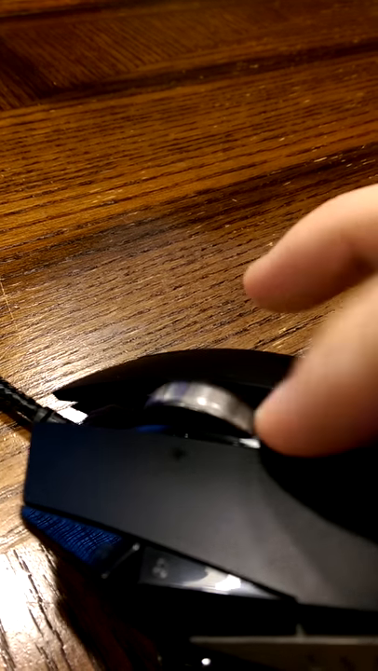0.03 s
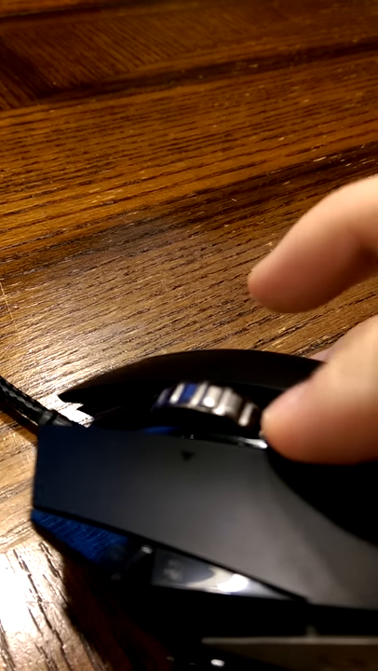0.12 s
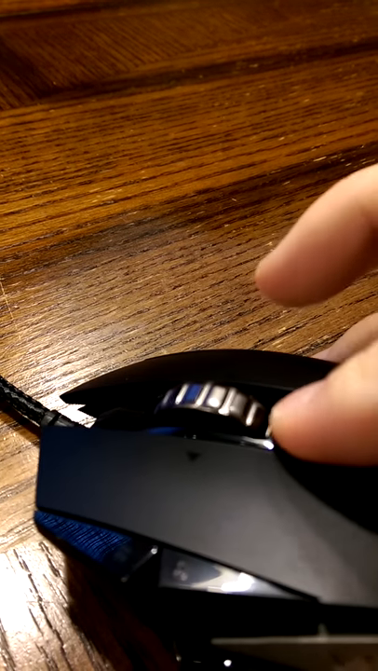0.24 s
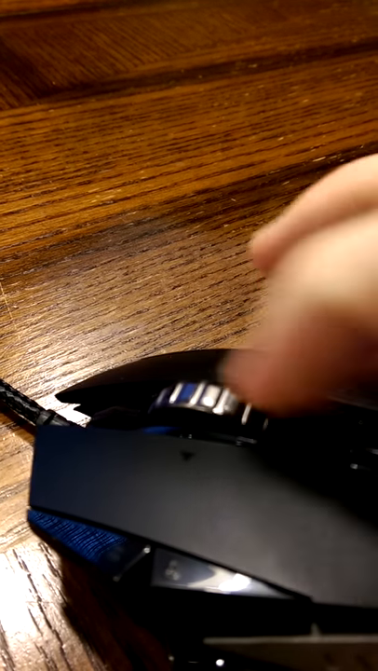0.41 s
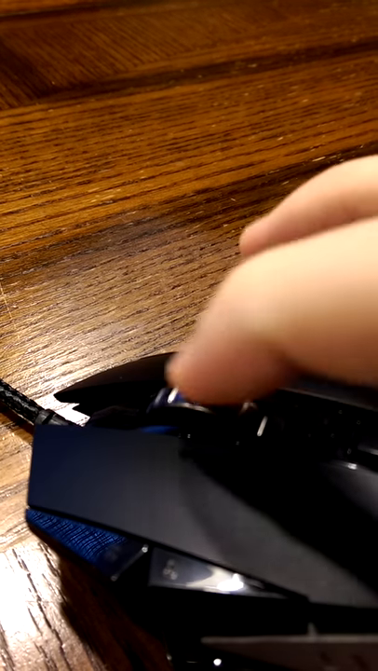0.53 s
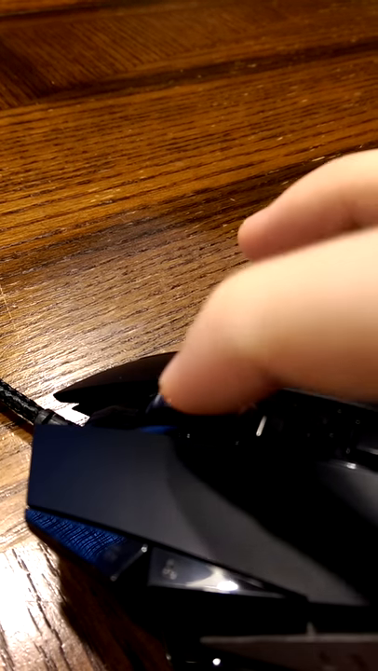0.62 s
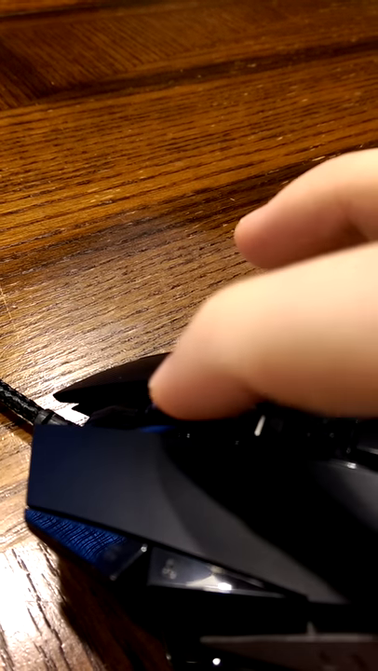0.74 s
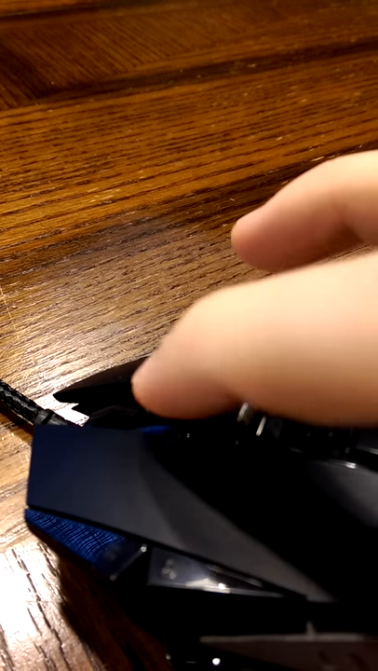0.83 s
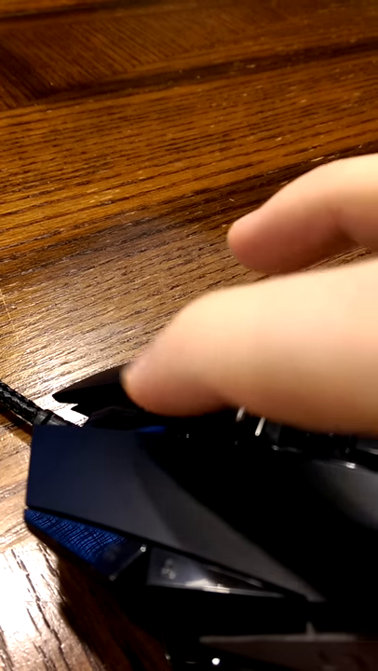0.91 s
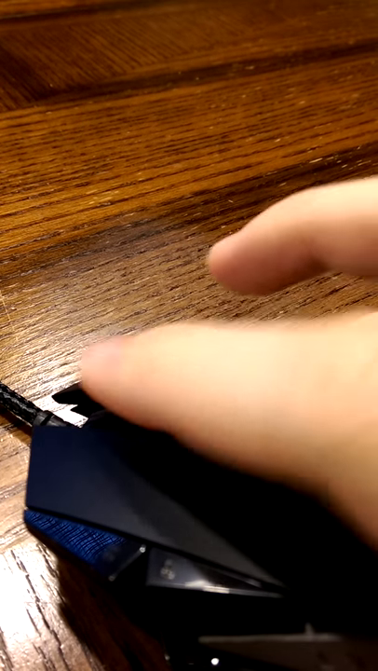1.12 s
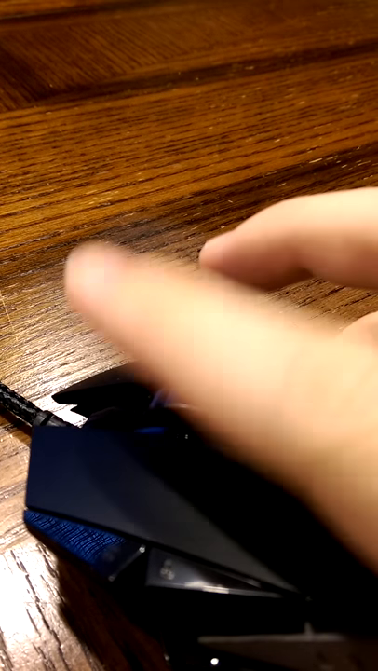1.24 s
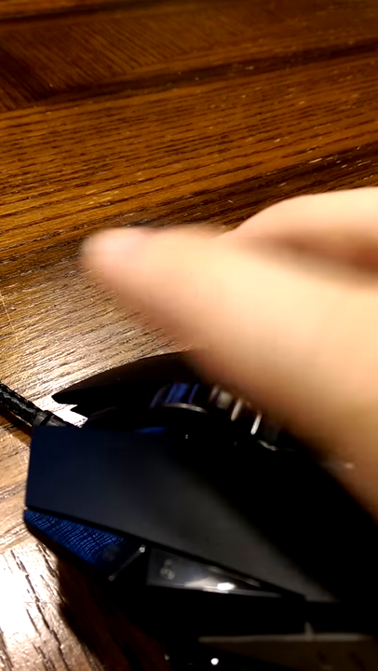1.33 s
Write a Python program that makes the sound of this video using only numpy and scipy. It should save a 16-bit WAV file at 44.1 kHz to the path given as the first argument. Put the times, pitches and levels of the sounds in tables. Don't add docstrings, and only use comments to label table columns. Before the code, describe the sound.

Close-up mouse wheel: light ticking and finger rub lead into two hard plastic clicks about a fifth of a second apart, then quiet, then weak notchy ticks with soft low table thumps, in a small room.

```python
import sys
import numpy as np
from scipy import signal
from scipy.fft import rfft, irfft, next_fast_len
from scipy.io import wavfile
from scipy.ndimage import uniform_filter1d

SR = 44100
rng = np.random.default_rng(int(sys.argv[2]) if len(sys.argv) > 2 else 0)


def store_pcm(level_fs):
    pcm = np.round(np.clip(level_fs, -1, 1) * 32767).astype(np.int16)
    wavfile.write(sys.argv[1], SR, np.atleast_2d(pcm).T)


def field_ratio(decibels):
    return 10 ** (np.asarray(decibels, dtype=float) / 20)


N = 59535

# [t/s, peak level/dB, rattle/ms, tilt/dB per octave]
LATCH_CLICKS = [
    (0.2172, -5.5, 0.8, 0.5),
    (0.4199, -5, 1.8, 2.5),
]
# [t/s, peak level/dB, rattle/ms, tilt/dB per octave]
DETENT_TICKS = [(0.1425, -34, 0.83, 7), (0.1466, -38.5, 2.5, -19), (0.1548, -33, 1.1, 0.5),
                (0.1847, -42.5, 2.6, 3), (0.187, -40, 1.3, 15), (0.1945, -42, 1.7, -10),
                (0.197, -46, 0.88, -3), (0.2045, -41, 0.85, -4), (0.2075, -47, 1.7, -4),
                (0.8956, -32.5, 1, -6.5), (0.9006, -37.5, 1.35, -25), (0.9097, -41.5, 0.74, -14),
                (0.9215, -51, 1.2, -6), (1.1502, -53, 1.7, -8), (1.0853, -32, 3.26, -4),
                (1.081, -52.5, 1.2, -3), (1.1566, -33, 2.4, -6), (1.165, -54, 1.5, -20),
                (1.1999, -32, 2.8, -4.5), (1.2034, -37, 1.8, -21.5), (1.2217, -43.5, 3.6, -32),
                (1.2448, -41, 0.72, 1)]
# [t/s, peak level/dB, rattle/ms, tilt/dB per octave]
SHELL_KNOCKS = [(0.029, -45, 1, -2), (0.115, -47.5, 2.27, -3), (0.147, -28.5, 0.56, -6.5),
                (0.158, -33.5, 0.53, 3), (0.189, -30.5, 2.8, 4), (0.193, -33, 0.32, -4),
                (0.197, -31, 1, 16), (0.208, -36, 1.7, 5), (0.217, -14, 3.8, 4.5), (0.379, -45, 0.58, -3),
                (0.421, -12.5, 1.8, 2), (0.8897, -36.5, 0.86, -1.5), (0.9017, -26, 1.13, 0.5),
                (0.91, -38, 1.2, 27), (0.92, -33, 1.7, 1.5), (0.996, -51, 1.14, 16), (1.081, -42, 1.6, 8),
                (1.0895, -32.5, 1.7, -7.5), (1.096, -31.5, 1, 4), (1.151, -38, 5.5, 18),
                (1.159, -36, 0.86, -3), (1.167, -39, 2.8, -14), (1.1935, -32.5, 4.3, -1),
                (1.2035, -30, 0.73, -18), (1.2232, -30.5, 0.88, 4.5), (1.2295, -39.5, 2.3, 10),
                (1.247, -46, 1.36, -1), (1.255, -41.5, 1.6, 0.5)]
# [t/s, peak level/dB, push/ms, tilt/dB per octave]
TABLE_PUSHES = [(0.0, -49.5, 0.77, -5), (0.147, -41.5, 1.3, 0), (0.189, -38, 0.68, -5),
                (0.214, -32, 1, 3.5), (0.233, -29.5, 0.84, 13), (0.424, -43.5, 1.09, -2.5),
                (0.892, -38.5, 0.51, 0.5), (0.92, -34, 0.65, 17), (0.965, -73, 1.5, 11),
                (0.999, -43.5, 1.2, 13), (1.094, -29, 0.44, -3), (1.111, -30, 0.35, 9),
                (1.165, -33, 2.1, -2.5), (1.172, -33.5, 1.13, 24), (1.203, -33, 1.2, 15),
                (1.235, -35.5, 0.56, 1), (1.255, -42, 0.47, 4)]
# [t/s, length/s, level/dB]
RUBS = [
    (0.14, 0.044, -43),
    (0.181, 0.083, -38.5),
    (0.891, 0.028, -35.5),
    (1.082, 0.038, -42),
    (1.149, 0.16, -49),
]
# [t/s, length/s, level/dB]
SLIPS = [
    (0.121, 0.03, -63),
    (0.882, 0.023, -62.5),
    (1.069, .022, -58.5),
    (1.133, 0.02, -59.5),
    (1.185, 0.013, -54),
    (1.235, .014, -57),
]

# [f/Hz, level/dB, t60/s]
LATCH_IN_MODES = [(1805, -15, 0.01), (2390, -14.5, 0.022), (2940, -9, 0.012), (3510, -6, 0.0098),
                  (5030, -3, 0.015), (6330, -6, 0.008), (7640, -0.5, 0.007), (4280, -7.5, 0.0045),
                  (9440, -10.5, 0.005), (10770, -0.5, 0.006), (11690, -2, 0.0046), (11900, -3, 0.0059),
                  (13560, -5.5, 0.0036)]
LATCH_BACK_MODES = [(1500, -9, 0.008), (2301, -9.5, 0.0071), (3057, -9, 0.0088), (3700, -11.5, 0.0057),
                    (4908, -6.5, 0.012), (6120, -1.5, 0.0066), (7444, 0, 0.0047), (8830, -9, 0.0081),
                    (9600, -2.5, 0.006), (11060, 2, 0.0038), (11356, 2, 0.0052), (12560, -3, 0.0043),
                    (14300, -12.5, 0.0042)]
DETENT_MODES = [(3820, -12.5, 0.0073), (4810, -10, 0.0098), (5557, -3, 0.0088), (6130, -4.5, 0.0052),
                (7300, 2.5, 0.0041), (8940, -11.5, 0.0064), (10170, -10, 0.0064), (12300, -17.5, 0.0054),
                (13700, -16.5, 0.00713)]
SHELL_MODES = [(928, -7, 0.033), (1034, 1.5, 0.013), (1173, 8, 0.011), (1566, 2, 0.005), (1706, -8, 0.044),
               (2078, 3.5, 0.014), (2350, 0, 0.013), (2806, 0, 0.0071)]
TABLE_MODES = [(168, -0.5, 0.34), (208.5, -4, 0.23), (75, -12.5, 0.047), (265.9, 6.5, 0.28),
               (282.5, 2.5, 0.74), (335.6, 9.5, 0.22), (408.2, -4, 0.3), (528.4, -2, .04)]

# [f/Hz, level/dB per Hz]
RUB_SPECTRUM = [(350, -30), (600, -6), (1190, -11.5), (1580, -13.5), (4230, -21.5), (5250, -19.5),
                (15000, -44)]
# [f/Hz, level/dB per Hz]
SLIP_SPECTRUM = [(3500, -41), (5500, 4), (8000, 5), (10000, -20)]
# [f/Hz, level/dB]
FAR_SHADOW = [(300, -5), (1100, -4), (1800, -4.5), (3000, -33), (5500, -46.5), (8000, -55.5), (15000, -49)]
# [f/Hz, level/dB, t60/s]
ROOM_BANDS = [(685, -25, 0.3), (1010, -31.5, 0.45), (1526, -32, 0.47), (1900, -37, 0.61), (3000, -32, 0.47),
              (3900, -30.5, 0.27), (4900, -39.5, 0.5), (5400, -42.5, 0.65), (6200, -31.5, 0.41),
              (6690, -38, 0.51), (7490, -34, 0.44), (8560, -33, .4), (10580, -34.5, 0.5),
              (12100, -37, 0.41), (14800, -46.5, .18)]
# [f/Hz, level/dB]
ROOM_FAR_PORT = [(300, -3), (1300, -0.9), (3000, -6), (6000, -19.5), (12000, -57)]
# [f/Hz, level/dB per Hz]
FLOOR_SPECTRUM = [(25, -14.5), (70, -11.5), (300, -7), (500, -8.5), (1000, -24), (5000, -29.5),
                  (14500, -34.5), (16000, -39)]
# [f/Hz, level/dB]
FLOOR_BALANCE = [(60, 9.5), (300, 3.5), (2400, 2), (8000, 4), (15000, 2.5)]

CLICK_DB, TICK_DB, KNOCK_DB, PUSH_DB = 5, 4.5, 0.5, -6
LATCH_VARY_DB, PLASTIC_VARY_DB, TABLE_VARY_DB = 1.2, 2.5, 1.2
LATCH_DETUNE, PLASTIC_DETUNE, TABLE_DETUNE = 0.002, 0.018, 0.004
HARD, SOFT = 0.9, 0.15
KNOCK_LEAD = 50
SMALL_BODY_HZ = 800
WAVER_DB, FAR_LAG_MS = 1.0, 0.22
ROOM_START_MS, WALL_MS, WALL_SPREAD_MS, WALL_DB = 2.9, 12.3, 3.0, -34
FLOOR_DB, FLOOR_WIDE_HZ = -63.5, 1470


def shape(points, hz):
    p = np.array(points, float)
    return np.interp(np.log(hz + 1), np.log(p[:, 0]), p[:, 1])


def colour(x, points, lag_ms=0.0):
    n = next_fast_len(x.shape[-1] + 4096)
    hz = np.arange(n // 2 + 1) * SR / n
    lag = np.exp(-2j * np.pi * hz * lag_ms / 1000)
    return irfft(rfft(x, n) * field_ratio(shape(points, hz)) * lag, n)[..., :x.shape[-1]]


def unit(x):
    return x / np.sqrt(np.mean(x ** 2))


def high_pass(x, order, hz):
    return signal.sosfilt(signal.butter(order, hz, "high", fs=SR, output="sos"), x)


def contact(ms, rough, chance):
    u = np.arange(512) / SR * 1000 / max(ms, 0.1)
    push = np.sqrt(u) * np.exp(-2 * u) * (rough * chance + 1 - rough)
    tones = rfft(push)
    whiten = (np.abs(tones) + 1e-9) ** (rough > 0.5)
    return irfft(tones / whiten) * np.exp(-(u / 3) ** 4)


def strike(events, modes, db, scatter_db, rough, detune, size):
    out = np.zeros((2, N + 2 * size))
    t = np.arange(size) / SR
    hz, gain_db, t60 = np.array(modes, float).T[:, :, None]
    count = len(modes)
    sign = (-1.0) ** np.arange(count)[:, None]
    fade = np.exp(-np.log(1000) * t / t60)
    chance = rng.standard_normal((len(events), 2 * count + 512))
    for (start, peak_db, ms, tilt_db), c in zip(events, chance):
        level_chance, pitch_chance = c[:count, None], c[count:2 * count, None]
        gain = field_ratio(gain_db + scatter_db * level_chance + tilt_db * np.log2(hz / hz[0]))
        wave = gain * sign * np.sin(2 * np.pi * hz * (1 + detune * pitch_chance) * t)
        ring = np.sum(wave * fade, axis=0)
        hit = signal.fftconvolve(ring, contact(ms, rough, c[-512:]))[:size]
        hit *= field_ratio(peak_db + db) / np.abs(hit).max()
        blur = np.sum(wave * fade ** 4, axis=0)
        blur *= np.sqrt(np.sum(hit ** 2) / np.sum(blur ** 2))
        i = max(int(start * SR), 0)
        out[:, i:i + size] += [hit, blur]
    return out[:, :N]


def latch_clicks():
    return sum(strike([click], modes, CLICK_DB, LATCH_VARY_DB, HARD, LATCH_DETUNE, size=1500)
               for click, modes in zip(LATCH_CLICKS, (LATCH_IN_MODES, LATCH_BACK_MODES)))


def detent_ticks():
    return strike(DETENT_TICKS, DETENT_MODES, TICK_DB, PLASTIC_VARY_DB, HARD, PLASTIC_DETUNE, size=1000)


def shell_knocks():
    knocks = strike(SHELL_KNOCKS, SHELL_MODES, KNOCK_DB, PLASTIC_VARY_DB, HARD, PLASTIC_DETUNE, size=2500)
    return np.roll(knocks, -KNOCK_LEAD, axis=1)


def rub():
    t = np.arange(N) / SR
    env = sum(field_ratio(db) * np.clip((t - start) / 0.0028, 0, 1) * np.clip(1 - (t - start) / length, 0, 1)
              for start, length, db in RUBS)
    grain_db = 4 * unit(uniform_filter1d(rng.standard_normal(N), size=90))
    grains = rng.standard_normal(N) * field_ratio(grain_db)
    return unit(colour(grains, RUB_SPECTRUM)) * env


def slip():
    t = np.arange(N) / SR
    env = 0
    for start, length, db in SLIPS:
        swell = np.clip((t - start) / length, 0, 1) ** 0.5
        release = np.exp(-np.clip(t - start - length, 0, 1) / 0.006)
        env = env + field_ratio(db) * swell * release
    return unit(colour(rng.standard_normal(N), SLIP_SPECTRUM)) * env


def table():
    drift = uniform_filter1d(rng.standard_normal(N), size=500)
    waver = unit(uniform_filter1d(drift, size=500))
    hum = strike(TABLE_PUSHES, TABLE_MODES, PUSH_DB, TABLE_VARY_DB, SOFT, TABLE_DETUNE, size=14000)[0]
    return high_pass(hum * field_ratio(WAVER_DB * waver), 2, 45)


def room(x):
    t = np.arange(SR) / SR
    tones = rfft(rng.standard_normal((2, SR)))
    octave = np.log2(np.arange(SR // 2 + 1) + 1)
    hz, level_db, t60 = np.array(ROOM_BANDS).T
    tail = 0
    for k, share in enumerate(np.eye(len(hz))):
        band = irfft(tones * np.interp(octave, np.log2(hz), share))
        tail = tail + field_ratio(level_db[k]) * band * np.exp(-np.log(1000) * t / t60[k])
    ms = t * 1000
    onset = np.clip(ms / ROOM_START_MS - 1, 0, 1)
    wall = field_ratio(WALL_DB + 38) * np.exp(-((ms - WALL_MS) / WALL_SPREAD_MS) ** 2)
    answer = 0.2 * tail * (onset + wall)
    wet = signal.fftconvolve(x[None], answer, axes=1)[:, :N]
    return np.array([wet[0], colour(wet[1], ROOM_FAR_PORT)])


def floor():
    mid, side = colour(rng.standard_normal((2, N)), FLOOR_SPECTRUM)
    side = colour(side, [(FLOOR_WIDE_HZ / 8, -12), (FLOOR_WIDE_HZ, 0)])
    scale = field_ratio(FLOOR_DB) / np.sqrt(np.mean(mid ** 2))
    left = colour(mid + side, [(hz, db / 2) for hz, db in FLOOR_BALANCE])
    right = colour(mid - side, [(hz, -db / 2) for hz, db in FLOOR_BALANCE])
    return scale * np.array([left, right])


def scene():
    mouse = latch_clicks() + detent_ticks() + shell_knocks() + rub()
    near, around = high_pass(mouse, 4, SMALL_BODY_HZ)
    close = near + table()
    direct = np.array([close, colour(close, FAR_SHADOW, FAR_LAG_MS)])
    hiss = slip() * np.array([[1], [0.1]])
    return direct + hiss + room(around) + floor()


def band_limit(x):
    return signal.sosfilt(signal.butter(12, 16870, fs=SR, output="sos"), x)


def record(dry):
    limit, top_hz = 0.96, 16200
    x = dry / (1 + (dry / limit) ** 6) ** (1 / 6)
    x = signal.sosfilt(signal.ellip(8, 0.2, 70, top_hz, fs=SR, output="sos"), x)
    return band_limit(x)


dry = scene()
out = record(dry)
store_pcm(out)
```